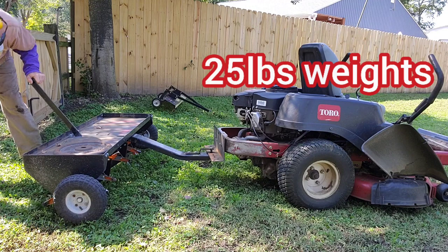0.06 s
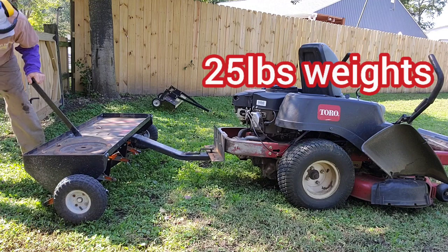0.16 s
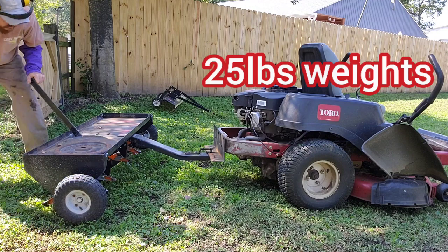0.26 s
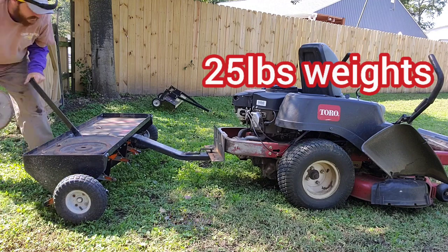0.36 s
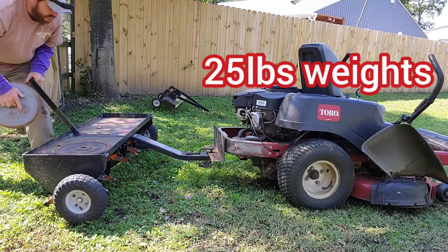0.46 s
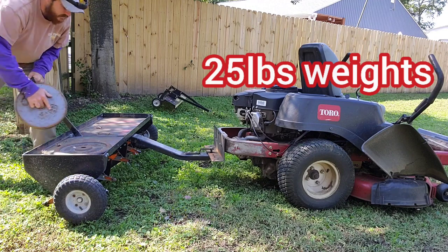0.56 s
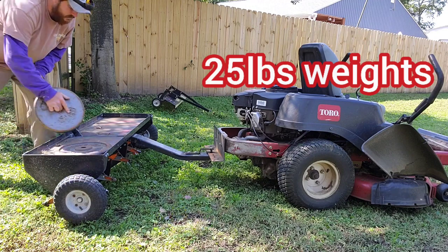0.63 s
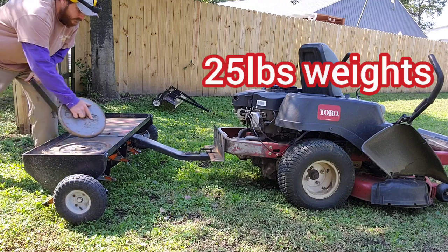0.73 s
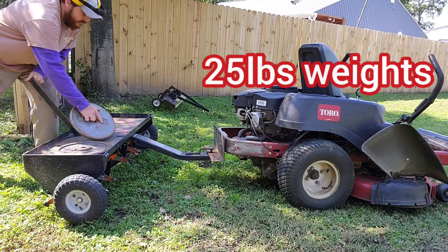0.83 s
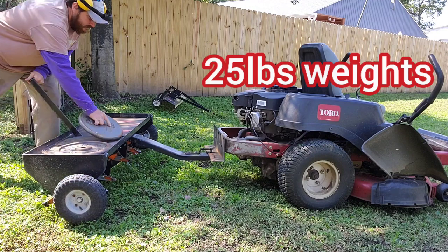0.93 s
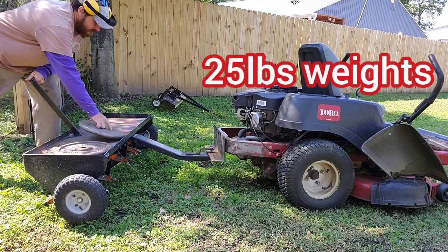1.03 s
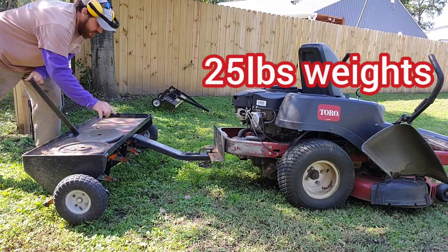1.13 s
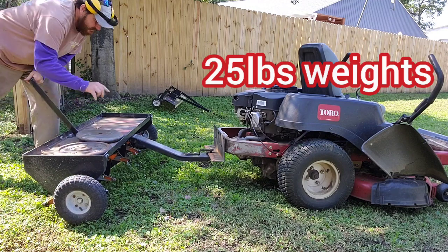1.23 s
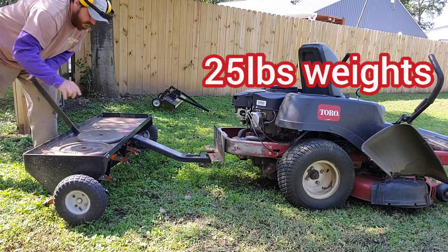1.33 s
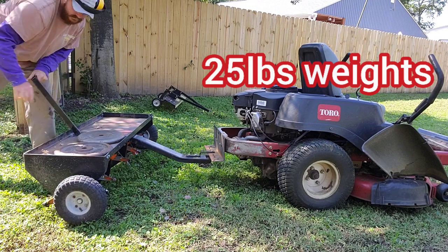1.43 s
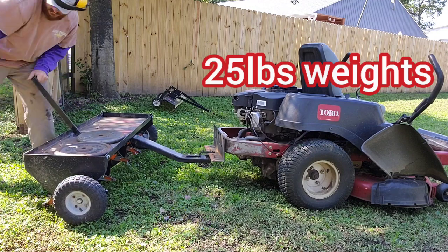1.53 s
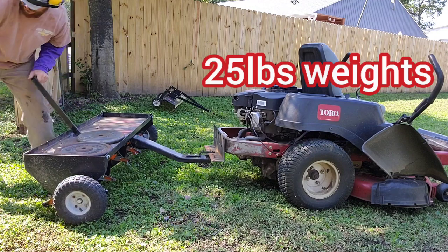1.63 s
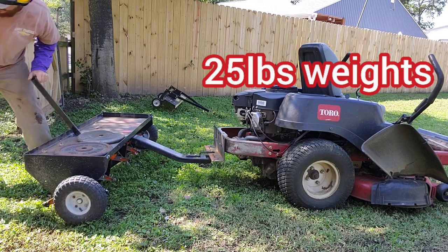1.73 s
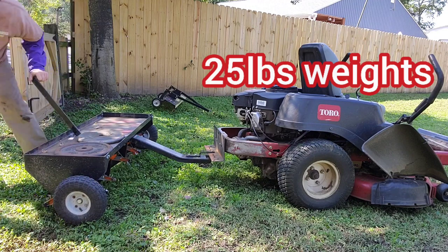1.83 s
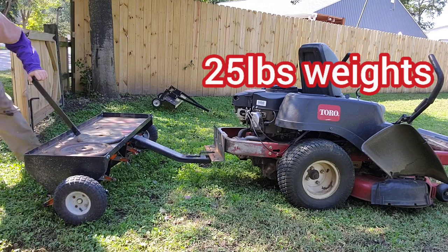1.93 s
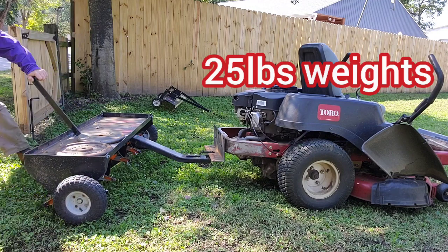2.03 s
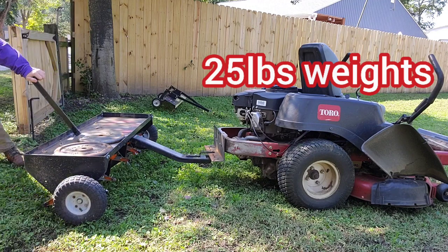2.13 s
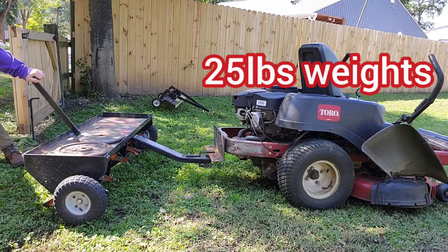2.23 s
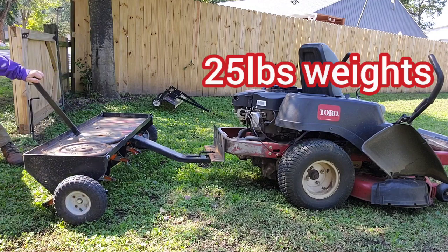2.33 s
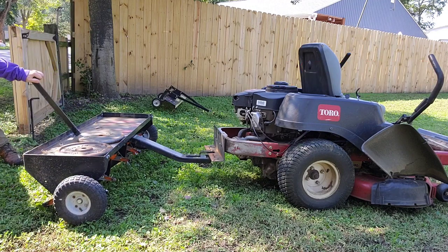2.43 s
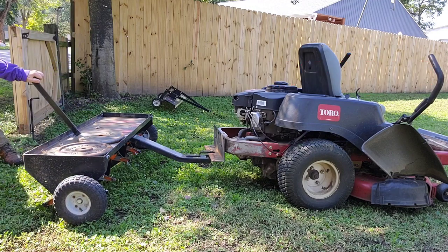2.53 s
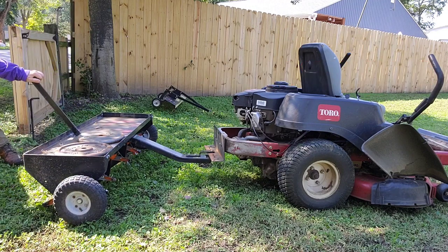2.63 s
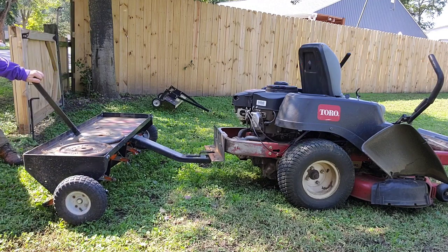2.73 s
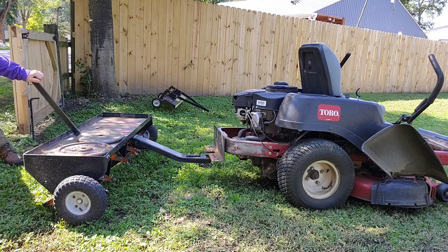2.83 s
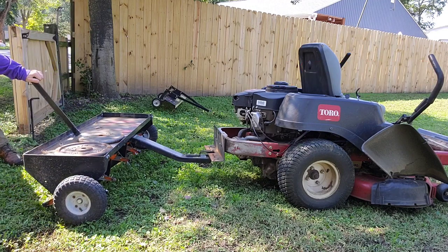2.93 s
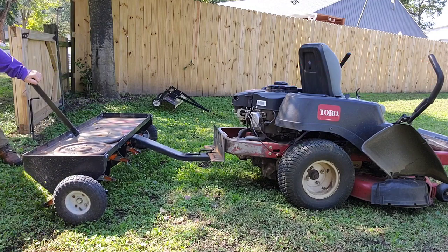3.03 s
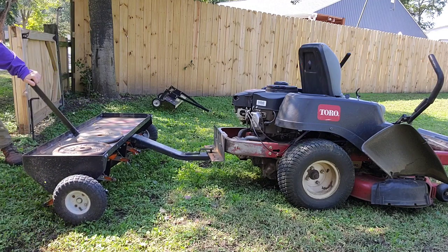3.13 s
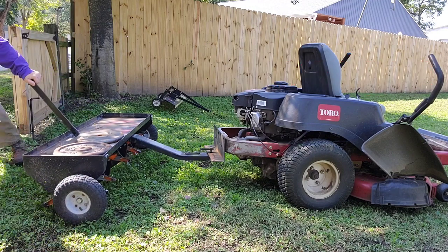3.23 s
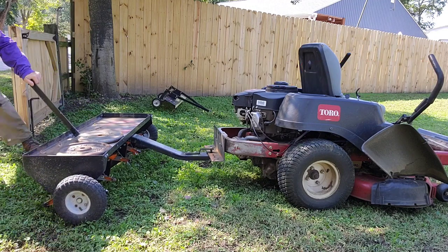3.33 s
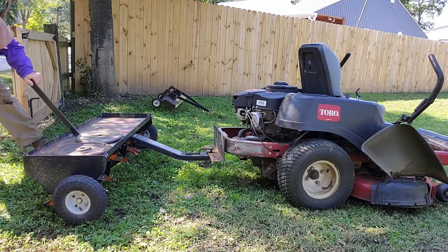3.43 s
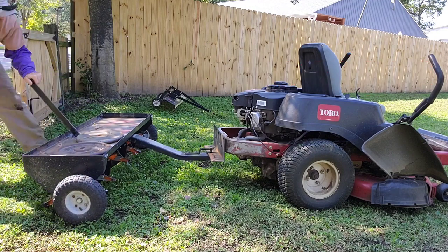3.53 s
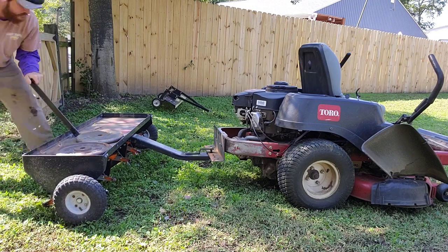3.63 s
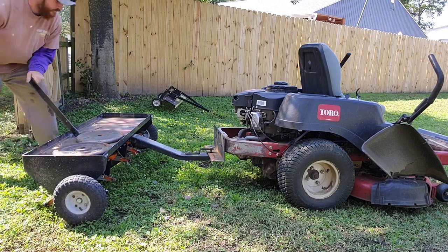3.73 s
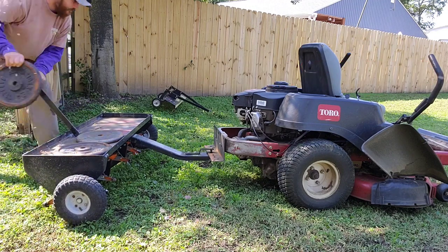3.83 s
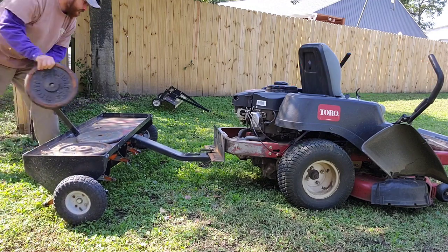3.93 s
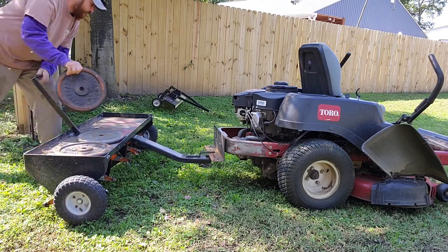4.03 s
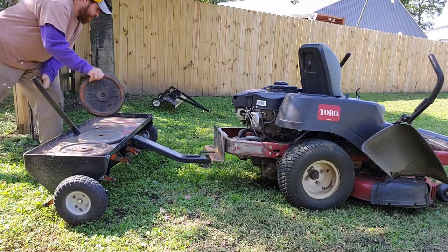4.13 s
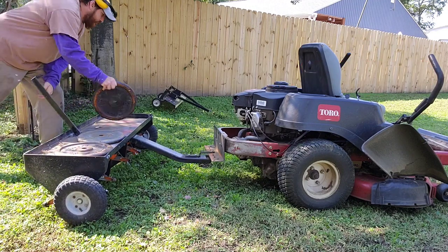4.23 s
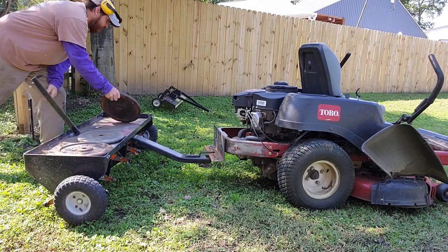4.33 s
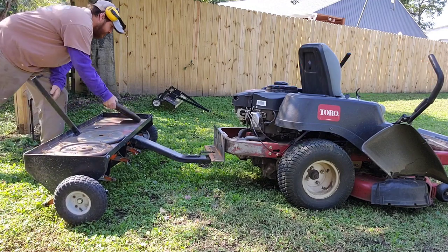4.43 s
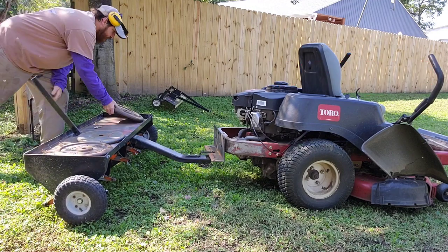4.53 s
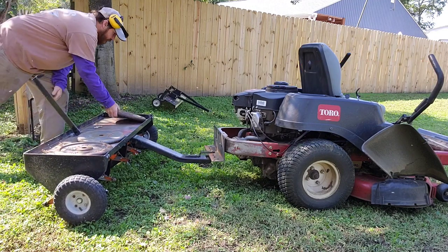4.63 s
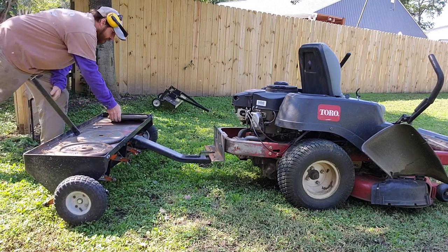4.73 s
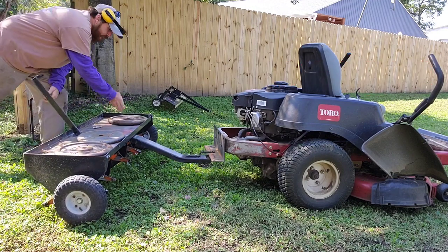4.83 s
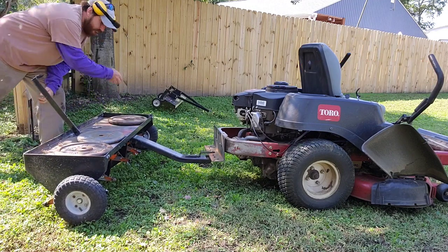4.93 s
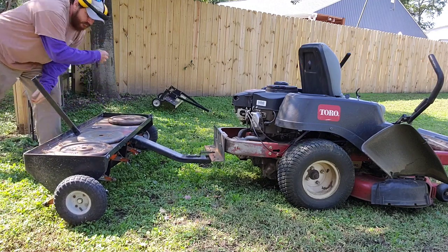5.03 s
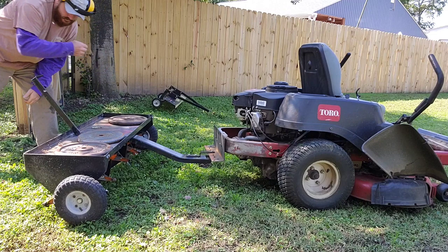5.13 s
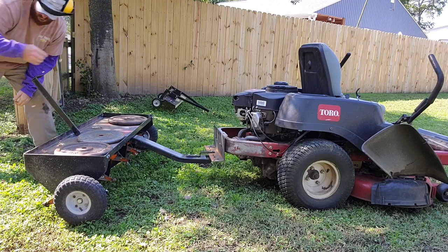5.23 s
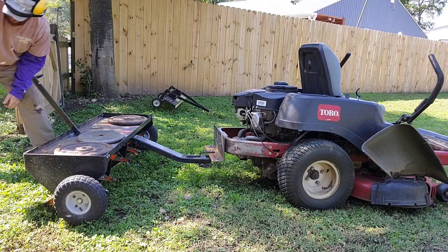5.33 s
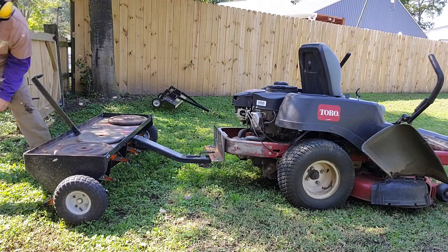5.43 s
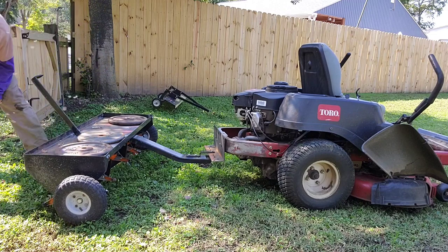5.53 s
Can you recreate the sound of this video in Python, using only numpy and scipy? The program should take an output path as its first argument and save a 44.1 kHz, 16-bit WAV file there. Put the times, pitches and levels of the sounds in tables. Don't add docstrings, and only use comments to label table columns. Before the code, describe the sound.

In an open fenced yard, an iron plate clinks off a stack, then crashes onto a steel trailer tray in a tight rattling cluster. After a pause come two brief pick-up clanks, then a second heavy run of bangs ending in the loudest hit. A faint engine drone, leaves, grassy steps and tiny bird chirps sit far below. Stereo phone a few metres away.

```python
import sys
import numpy as np
from scipy import signal
from scipy.fft import rfft, irfft, next_fast_len
from scipy.io import wavfile
from scipy.ndimage import uniform_filter1d

SR = 44100
rng = np.random.default_rng(int(sys.argv[2]) if len(sys.argv) > 2 else 0)


def wav_record(signal):
    frames = np.transpose(np.atleast_2d(signal))
    bounded = np.clip(frames, -1, 1)
    quanta = np.round(bounded * 32767).astype(np.int16)
    wavfile.write(sys.argv[1], SR, quanta)


def to_linear_factor(level_db):
    exponent = np.asarray(level_db, float) / 20
    return 10 ** exponent


N = 245637
LENGTH = 18000


def along(points, hz):
    p = np.array(points, float)
    return np.interp(np.log(hz), np.log(np.maximum(p[:, 0], 1)), p[:, 1])


def convolve(a, b):
    return signal.fftconvolve(a, b, axes=-1)


def rings(hz, t60):
    t = np.arange(LENGTH) / SR
    sines = np.sin(2 * np.pi * hz[:, None] * t)
    return (sines * np.exp(-np.log(1000) * t / t60[:, None])).astype(np.float32)


def walk(rate):
    hold = int(SR / rate)
    steps = np.repeat(rng.standard_normal(N // hold + 1), hold)
    return 1.1 * uniform_filter1d(uniform_filter1d(steps, hold), hold)[:N]


def noise(hz, octaves, alike):
    size = next_fast_len(N)
    f = np.maximum(np.fft.rfftfreq(size, 1 / SR), 1)
    bell = np.exp(-(np.log2(f / hz) / octaves) ** 2)
    mid, side = irfft(rfft(rng.standard_normal((2, size))) * bell, size)[:, :N]
    alike = np.clip(alike, 0, 1)
    both = np.sqrt(1 + alike) * mid + np.sqrt(1 - alike) * side * np.array([[1], [-1]])
    return both / both.std()


# (t/s, firing f/Hz, level/dB, octave level/dB)
ENGINE = [(0.0, 78.47, -60.5, -69), (0.45, 73.86, -61.5, -72.5), (0.9, 74.38, -54, -69),
          (1.501, 77.95, -52.5, -67.5), (2.1, 76.67, -50.5, -66), (2.7, 79.08, -55, -60.5),
          (3.1, 77.9, -48.5, -63.5), (4.0, 74.7, -49.5, -74), (4.3, 78, -49, -68.5),
          (5.251, 77.4, -52.5, -60), (5.57, 79.4, -54.5, -77.5)]
# (f/Hz, level/dB)
HUMS = [(52, -61.5), (94, -63), (180, -77), (760, -83), (950, -91.5)]


def drone():
    s, *columns = np.transpose(ENGINE)
    hz, db, octave_db = (np.interp(np.arange(N) / SR, s, c) for c in columns)
    phase = 2 * np.pi * np.cumsum(hz * (1 + 0.005 * walk(23))) / SR
    out = to_linear_factor(db + 3.0 * walk(8.8)) * np.sin(phase)
    out += to_linear_factor(octave_db + 1.8 * walk(27)) * np.sin(2 * phase)
    for hum_hz, hum_db in HUMS:
        hum_phase = 2 * np.pi * np.cumsum(hum_hz * (1 + 0.019 * walk(8.6))) / SR
        out += to_linear_factor(hum_db + 2.4 * walk(1.7)) * np.sin(hum_phase)
    return np.sqrt(2) * out


def air(spectrum, level_db, bands_hz, swell_db, flicker_db):
    out, swell = 0, walk(0.7)
    for hz in bands_hz:
        db = along(spectrum, hz) + 10 * np.log10(hz) + swell_db * swell + flicker_db * walk(6.9)
        out = out + to_linear_factor(db) * noise(hz, .27, 1.05 - hz / 900)
    return out / out.std() * to_linear_factor(level_db)


# (f/Hz, level/dB per Hz)
RUMBLE_COLOUR = [(20, -13.5), (55, -5), (81, -2), (129, -11), (169, -11.5), (226, -19), (260, -28)]


def rumble():
    s, _, engine_db, _ = np.transpose(ENGINE)
    follow = 0.59
    nearness = to_linear_factor(follow * np.interp(np.arange(N) / SR, s, engine_db - engine_db.mean()))
    return nearness * air(RUMBLE_COLOUR, -58, np.geomspace(22, 220, 11), swell_db=1.6, flicker_db=3.5)


# (f/Hz, level/dB per Hz)
LEAF_COLOUR = [(200, -12.5), (300, -6.5), (400, -13), (763, -10.5), (1080, -15), (1810, -14), (4120, -22),
               (10300, -35.5), (16000, -36)]
# (t/s, level/dB)
BREEZE_LEVEL = [
    (0, 4),
    (.6, 0.5),
    (1.8, 4.5),
    (2.6, 2),
    (3.5, 1.5),
    (3.95, -0.5),
    (5.1, 11),
    (5.57, 0.5),
]


def leaves():
    breeze = to_linear_factor(np.interp(np.arange(N) / SR, *np.transpose(BREEZE_LEVEL)))
    return breeze * air(LEAF_COLOUR, -69, np.geomspace(260, 15500, 17), swell_db=.6, flicker_db=.9)


SLIDE_SWELL = .75


def timed(knocks, swell_s, slides=()):
    return [row + (swell_s,) for row in knocks] + [row + (SLIDE_SWELL * row[4],) for row in slides]


# (f/Hz, level/dB per Hz)
SHEET_COLOUR = [(90, -18.5), (151, -17.5), (345, -4.5), (402, -9), (720, -13.5), (1540, -10), (2090, -9.5),
                (3220, -6), (3910, -10.5), (5410, -6), (8000, -19), (9310, -33.5), (11800, -26),
                (16000, -41)]
# (f/Hz, time to fall 60 dB/s)
SHEET_DECAY = [(100, 0.48), (400, 0.21), (1500, 0.22), (5000, 0.07), (12000, 0.034)]
TILT_HZ = (320, 1500, 5600, 10500)


def blows(table, modes, sheet_hz, sheet, pan_db, edge_db, modes_db, scatter_db=2.0, grit_db=3.6,
          first=2.3, apart_hz=700, crack=0.51, crack_s=0.0012, own_spread=1.1, slide_grit_db=1.5):
    own_hz, own_width, own_db = np.transpose(modes)
    own_t60 = 1.7 * np.log(1000) / (np.pi * own_width)
    own = rings(own_hz, np.clip(own_t60, .05, 1.9 * along(SHEET_DECAY, own_hz)))
    hz, count = np.concatenate([sheet_hz, own_hz]), len(sheet_hz)
    sheet_db = along(SHEET_COLOUR, sheet_hz)
    sheet_db = sheet_db + 10 * np.log10(sheet_hz ** .45 / along(SHEET_DECAY, sheet_hz))
    db = np.concatenate([sheet_db - sheet_db.max(), own_db + modes_db])
    part = np.array([hz < 600, (hz >= 600) & (hz < 3500), hz >= 3500])
    flat_db = -10 * np.log10(part @ to_linear_factor(db) ** 2 / 2)
    scatter_db = np.where(np.arange(len(hz)) < count, scatter_db, scatter_db / 2)
    alike = 1 - .5 * hz ** 2 / (hz ** 2 + apart_hz ** 2)
    lean = own_spread * rng.standard_normal(len(hz)) * np.sqrt(1 - alike)
    t = np.arange(LENGTH) / SR
    out = np.zeros((2, N + 2 * LENGTH))
    for s, body_db, boom_db, clank_db, chatter, swell in table:
        sliding = swell > .006
        place, side, left, right = rng.standard_normal((4, len(hz)))
        tilt = flat_db[[0, 1, 2, 2]] + [boom_db, 0, clank_db, clank_db + edge_db]
        tilt_db = along(np.transpose([TILT_HZ, tilt]), hz)
        ears = np.sqrt(alike) * np.sign(side) + np.sqrt(1 - alike) * np.array([left, right])
        ears[:, count:] = (np.sign(side) * (1 + np.array([lean, -lean])))[:, count:]
        gain = (to_linear_factor(body_db + db + tilt_db + scatter_db * place) * ears).astype(np.float32)

        rise = (1 - np.exp(-2 * (t + 1 / SR) / max(swell, .0001))) ** 2
        roughness_db = slide_grit_db if sliding else grit_db
        contacts = rng.standard_normal(LENGTH) * to_linear_factor(roughness_db * rng.exponential(size=LENGTH))
        contacts *= rise * np.exp(-t / max(chatter, .001))
        contacts[int(swell * SR)] = first * np.abs(contacts).max() * np.exp(-swell / 0.0018)
        contacts = contacts[None] / np.linalg.norm(contacts)

        i = int(s * SR)
        steel = gain[:, :count] @ sheet * (1 + crack * np.exp(-t / crack_s))
        plate = gain[:, count:] @ own
        out[:, i:i + 2 * LENGTH - 1] += convolve(steel + sliding * plate, contacts)
        out[:, i:i + LENGTH] += (not sliding) * rise * plate
    return out[:, :N] * to_linear_factor(np.array([[pan_db], [-pan_db]]) / 2)


FIRST_SCRAPE = [
    (0.012, -50, -6.5, 0, 0.017),
]
FIRST_PICK = [
    (0.045, -30.5, -12.5, -2, 0.013),
    (0.074, -44, 8, -13, 0.021),
]
DROP_SLIDES = [
    (0.871, -50, -9, -2, 0.017),
    (.965, -18, 1.5, -10, 0.037),
    (0.987, -18.5, -5.5, -3.5, 0.013),
    (1.075, -28, -5.5, -3, 0.019),
    (1.276, -13.5, -2, -1.5, 0.03),
]
FIRST_TOUCH = [
    (0.89, -25.5, 9, -10.5, 0.027),
    (0.906, -27, 3, -7, 0.03),
    (0.924, -25, -1.5, -7.5, 0.026),
    (1.004, -19, -8, -0.5, 0.0047),
    (1.039, -18, -9, -14, 0.13),
]
FIRST_DROP = [
    (1.105, -17.5, -1.5, 5, 0.006),
    (1.116, -18.5, -1.5, 5.5, 0.035),
    (1.132, -8.5, -12.5, -0.5, 0.012),
    (1.141, -12.5, -11.5, 2.5, 0.01),
    (1.151, -12, -6, 3.5, 0.019),
    (1.168, -10.5, -18.5, 1.5, 0.0087),
    (1.177, -13, -11, -0.5, 0.012),
    (1.197, -8.5, -19, -6.5, 0.031),
    (1.235, -11.5, -17.5, -11, 0.013),
]
FIRST_SETTLE = [
    (1.292, -22, -17, 5, 0.0047),
    (1.299, -13, -9, 3, 0.014),
    (1.309, -9, -18.5, -6.5, 0.038),
    (1.349, -9.5, -29, -24, 0.043),
    (1.397, -21.5, -8.5, -11, 0.02),
    (1.44, -23, -14.5, -37, 0.0079),
    (1.499, -28, -10.5, -5.5, 0.0079),
]
SECOND_SWELL = [
    (2.975, -46, 1.5, -24, 0.046),
    (3.012, -44, -4, -14, 0.042),
    (3.045, -36.5, -3.5, -10.5, 0.041),
]
SECOND_PICK = [
    (3.07, -20.5, -21, -2, 0.0062),
    (3.089, -31.5, 6, -0.5, 0.011),
]
SECOND_SETTLE = [
    (3.125, -24, -6, -8, 0.024),
    (3.159, -22, -22, -14, 0.0071),
    (3.189, -26.5, -37.5, -23, 0.007),
]
THIRD_SWELL = [
    (4.002, -46, -8.5, -13.5, 0.033),
    (4.047, -24, -18.5, -17.5, 0.054),
]
THIRD_PICK = [
    (4.075, -17, -9.5, -2, 0.0078),
]
THIRD_SETTLE = [
    (4.166, -30.5, -5.5, -4, 0.011),
    (4.218, -34.5, -7, -32, 0.027),
]
LAST_SLIDES = [
    (4.355, -31, -9.5, -1, 0.02),
    (4.578, -31, 0.5, -3.5, 0.015),
    (4.857, -14.5, -2, 4, 0.027),
]
LAST_TOUCH = [
    (4.37, -8.5, -5, -11, 0.015),
    (4.398, -12, -6.5, -3.5, 0.017),
    (4.444, -17, -3, -14, 0.044),
    (4.473, -26.5, -10.5, -6, 0.3),
]
LAST_TILT = [
    (4.59, -10.5, -9, -14, 0.0092),
    (4.596, -16.5, -16.5, -8.5, 0.021),
    (4.632, -9.5, -14, -4, 0.0098),
    (4.648, -14, -2.5, -8, 0.012),
    (4.678, -18.5, -6, -45.5, 0.016),
]
LAST_DROP = [
    (4.794, -19.5, -6.5, -10, 0.053),
    (4.804, -28, -8.5, -10, 0.011),
    (4.872, -12.5, -7.5, -1, 0.012),
    (4.881, -5.5, -9.5, -3.5, 0.024),
    (4.894, -14, -9.5, -5, 0.022),
    (4.91, -7.5, -8, -12.5, 0.023),
    (4.944, -14, -20, -11.5, 0.0063),
    (4.977, -26, -11, -30, 0.017),
]
# (f/Hz, width/Hz, level/dB)
FIRST_PICK_TONES = [(436, 13, 0), (592, 23, -0.5), (1090, 47, 11), (1965, 23, 1.5), (2250, 41, 10.5),
                    (2350, 35, 8.5), (3180, 37, 12.5), (3430, 33, 3), (4500, 36, -9), (4730, 47, 8.5),
                    (5500, 57, 6), (6100, 42, -14)]
FIRST_TOUCH_TONES = [(334, 180, 0.5), (920, 80, -3.5), (1370, 52, -10), (1840, 77, -6), (2320, 130, -10.5),
                     (3140, 110, -15.5), (4300, 41, -18), (4750, 23, -15), (4770, 34, -12),
                     (5190, 29, -15.5), (5450, 120, -13), (5730, 110, -10.5), (6060, 85, -13),
                     (6310, 30, -13.5)]
FIRST_DROP_TONES = [(328, 59, -4.5), (846, 42, -3.5), (1858, 48, -3.5), (2270, 110, -6.5), (2530, 54, -3.5),
                    (3150, 62, -5.5), (3450, 37, -6.5), (4040, 55, -10), (5000, 50, -4), (5300, 100, -0.5),
                    (5460, 36, -3.5), (5570, 40, -4.5), (5890, 38, -4.5), (6060, 87, -5)]
FIRST_SETTLE_TONES = [(322, 41, 0.5), (845, 37, -3.5), (1740, 130, -4.5), (1850, 23, -6.5), (2350, 120, -6),
                      (2754, 26, -11), (3490, 34, -7), (3660, 43, -9.5), (4200, 46, -8.5),
                      (4780, 100, -8.5), (5330, 150, -10), (5720, 69, -5), (5880, 23, -7),
                      (6260, 42, -10.5)]
FIRST_REST_TONES = [(226, 150, -2.5), (877, 28, -5.5), (955, 6, -1.5), (1185, 31, -0.5), (1510, 42, -4),
                    (1702, 63, -3), (2520, 47, -1), (3240, 46, 5), (3500, 23, -11)]
SECOND_SWELL_TONES = [(528, 38, 8.5), (1070, 29, -6), (1500, 29, -9), (1882, 29, -16), (2870, 32, -14.5),
                      (4180, 30, -24), (5310, 27, -23.5)]
SECOND_PICK_TONES = [(299, 160, -10), (577, 15.2, 0), (1040, 29, 2), (1580, 42, -17), (2330, 30, -1.5),
                     (3450, 110, -12), (3850, 36, -14), (4350, 30, -6), (4550, 48, -11), (5570, 22, -25),
                     (5440, 100, -5), (5950, 34, -8), (7740, 30, -4), (8280, 54, -11)]
SECOND_SETTLE_TONES = [(224, 21, 2.5), (376, 22, -7), (869, 12.8, -0.5), (1510, 25, -5), (1810, 23, -2),
                       (2290, 17, -9), (2960, 56, 12), (3290, 120, -12.5), (4090, 120, -1), (4710, 90, -13),
                       (4960, 62, -11), (5400, 38, -8), (5630, 30, -10)]
THIRD_PICK_TONES = [(447, 36, -2.5), (1040, 24, -8.5), (1519, 26, -4), (2410, 170, -12), (3010, 42, -12),
                    (3270, 61, -13.5), (3470, 42, -11.5), (4600, 26, -11), (5500, 25, -14), (5910, 30, -10),
                    (6100, 39, -15.5), (7030, 93, -22.5), (7780, 41, -12.5), (8000, 25, -17)]
THIRD_SETTLE_TONES = [(455, 32, -1.5), (870, 30, -9), (1020, 34, -9), (1500, 26, -5), (1880, 93, 1),
                      (2280, 41, -9), (2860, 100, -11), (3320, 32, -12.5), (4040, 62, -15), (4600, 77, -12),
                      (5230, 37, -13), (5730, 50, 0), (6350, 39, -2.5)]
LAST_TOUCH_TONES = [(355, 130, -1.5), (607, 35, -3), (947, 39, -5), (1285, 28, -9), (1530, 53, -3),
                    (2650, 43, -13.5), (3170, 94, -16), (3830, 27, -18.5), (4290, 28, -17.5),
                    (4860, 43, -13), (5400, 80, -14.5), (5630, 100, -13.5), (6000, 66, -14),
                    (6420, 30, -16.5)]
LAST_TILT_TONES = [(450, 51, -2), (780, 32, -7.5), (1167, 25, -12), (1410, 30, 0), (1880, 55, -6.5),
                   (2390, 50, 4), (2540, 40, 2), (3180, 40, 5), (4880, 42, -15.5), (5380, 130, -8.5),
                   (5790, 39, -12.5), (6370, 49, -18)]
LAST_LAY_TONES = [(350, 44, 1.5), (781, 65, -5), (1520, 30, -8.5), (1750, 59, -3), (1940, 41, -3.5),
                  (2650, 45, -1), (3160, 81, -10.5), (4020, 39, -15.5), (4300, 57, -16.5), (5070, 40, -8.5),
                  (5640, 70, -2), (6090, 40, -8.5)]
LAST_NUDGE_TONES = [(371, 150, 2.5), (1410, 55, 3.5), (1870, 67, -0.5), (2310, 49, -8), (3280, 32, -7.5),
                    (3490, 37, -11), (5160, 120, -11.5), (5650, 58, -6), (5940, 54, -8), (6640, 26, -18)]
LAST_DROP_TONES = [(339, 71, -0.5), (1154, 23, -4), (1520, 47, -2.5), (1770, 45, -3.5), (2270, 46, -5.5),
                   (2620, 23, -9), (3100, 370, -8.5), (3490, 24, -9.5), (4730, 56, -14.5), (5200, 38, -9.5),
                   (5520, 40, -7), (6060, 100, -8.5), (6610, 56, -15.5), (6930, 27, -11)]
# (f/Hz, width/Hz, level/dB)
TRAY_TONES = [(955, 7.1, -16.5), (863, 7.1, -19), (1720, 9, -18.5), (448.4, 7, -16)]


def plates():
    hz = 110 + 15800 * ((np.arange(900) + rng.random(900)) / 900) ** 1.8
    sheet = rings(hz, along(SHEET_DECAY, hz) * np.exp(0.21 * rng.standard_normal(len(hz))))
    iron, tray = 0.00071, 0.0029
    groups = [
        (timed(FIRST_PICK, iron, FIRST_SCRAPE), FIRST_PICK_TONES, 1.5, 6.5),
        (timed(FIRST_TOUCH, tray, DROP_SLIDES[:4]), FIRST_TOUCH_TONES, .3, 9),
        (timed(FIRST_DROP, tray), FIRST_DROP_TONES, .3, 9),
        (timed(FIRST_SETTLE[:4], tray, DROP_SLIDES[4:]), FIRST_SETTLE_TONES, .3, 9),
        (timed(FIRST_SETTLE[4:], tray), FIRST_REST_TONES, .3, 9),
        (timed([], iron, SECOND_SWELL), SECOND_SWELL_TONES, 1.5, 14),
        (timed(SECOND_PICK, iron), SECOND_PICK_TONES, 6, 12),
        (timed(SECOND_SETTLE, 2 * tray), SECOND_SETTLE_TONES, 3, 11),
        (timed(THIRD_PICK, iron, THIRD_SWELL), THIRD_PICK_TONES, 6, 13),
        (timed(THIRD_SETTLE[1:], 2 * tray, THIRD_SETTLE[:1]), THIRD_SETTLE_TONES, .3, 12),
        (timed(LAST_TOUCH, tray, LAST_SLIDES[:1]), LAST_TOUCH_TONES, .3, 9),
        (timed(LAST_TILT[:2], tray, LAST_SLIDES[1:2]), LAST_TILT_TONES, .3, 9),
        (timed(LAST_TILT[2:], tray), LAST_LAY_TONES, .3, 9),
        (timed(LAST_DROP[:2], tray), LAST_NUDGE_TONES, .3, 8),
        (timed(LAST_DROP[2:], tray, LAST_SLIDES[2:]), LAST_DROP_TONES, .3, 9),
    ]
    out = 0
    for table, tones, edge_db, ring_db in groups:
        out = out + blows(table, tones + TRAY_TONES, hz, sheet, pan_db=-0.8, edge_db=edge_db, modes_db=ring_db)
    no_bass = signal.butter(2, 150, "high", fs=SR, output="sos")
    out = signal.sosfilt(no_bass, out) * to_linear_factor(-1.0)
    return out + thuds(FIRST_TOUCH + FIRST_DROP + FIRST_SETTLE + LAST_TOUCH + LAST_TILT + LAST_DROP)


def yard(x, low_t60=0.86, high_t60=0.27, split_hz=2500, gap=0.012, level_db=-16):
    t = np.arange(SR) / SR
    spray = rng.standard_normal((2, SR)) * (1 - np.exp(-(t / gap) ** 2))
    low = signal.sosfilt(signal.butter(1, split_hz, fs=SR, output="sos"), spray)
    high = spray - low
    low = (low + low[::-1] * 0.4) / 3.7
    tail = low * np.exp(-np.log(1000) * t / low_t60) + high * np.exp(-np.log(1000) * t / high_t60)
    return to_linear_factor(level_db) * convolve(x, tail / np.linalg.norm(tail[0]))[:, :N]


# (t/s, level/dB, length/s, brightness/dB per octave)
FOOTSTEPS = [
    (0.314, -65.5, 0.028, -2),
    (2.107, -67, 0.029, -4),
    (3.714, -71.5, 0.0052, -2),
    (3.869, -74, 0.59, -8),
    (3.877, -71, 0.017, 1.5),
    (5.074, -63, 0.018, 2),
    (5.152, -62.5, 0.049, -1),
    (5.267, -59.5, 0.1, -1.5),
]
# (f/Hz, width/octaves, level/dB)
SWISH_BANDS = [(570, 1, -9), (1600, 0.92, -18.5), (3180, 0.88, -3.5), (6000, 0.57, -0.5),
               (11200, 0.26, -9.5), (13700, 0.19, -7)]
# (t/s, level/dB,
# length/s, centre f/Hz, width/octaves)
BAND_NOISES = [(0.17, -66, 0.052, 412, 1.), (1.634, -55, 0.14, 313, 1.), (3.333, -65, 0.14, 513.5, 0.95),
               (3.615, -65.5, 0.03, 780, 0.089), (3.748, -65, 0.053, 350, 0.56),
               (3.911, -68, .1, 2485, 0.028), (3.9, -71, 0.096, 2900, 0.041),
               (3.905, -61.5, 0.26, 2270, 0.85), (5.175, -65.5, 0.054, 7640, 0.089),
               (5.278, -66, 0.047, 7000, .1), (5.315, -56.5, 0.15, 294, 0.73),
               (5.436, -62.5, 0.37, 2550, 1.), (5.469, -74, .2, 5500, .5),
               (2.11, -77.5, 0.031, 13000, 0.26), (2.272, -83.5, 0.054, 13040, 0.23),
               (3.86, -76, .045, 12740, .25)]


def feet():
    out, t = 0, np.arange(N) / SR

    def bell(s, length):
        return np.exp(-((t - s) / length) ** 2)

    for hz, octaves, band_db in SWISH_BANDS:
        loss = 150 * (hz > 13000)
        level = 0
        for s, db, length, bright_db in FOOTSTEPS:
            level = level + to_linear_factor(db + bright_db * np.log2(hz / 3100) - loss * length) * bell(s, length)
        crackle = to_linear_factor(band_db + 2.2 * walk(80) + 1.1 * walk(21))
        out = out + level * crackle * noise(hz, octaves, 0.11)
    for s, db, length, hz, octaves in BAND_NOISES:
        rough = to_linear_factor(db + 1.8 * walk(100) + 1.2 * walk(28))
        out = out + rough * bell(s, length) * noise(hz, octaves, 0.41)
    return out


def thuds(table):
    push = np.zeros(N)
    for s, body_db, boom_db, *_ in table:
        push[int(s * SR)] = to_linear_factor(body_db + boom_db - 22)
    soft = uniform_filter1d(push, 130)
    bob_hz, bob_t60_s = np.array([91]), np.array([0.49])
    return convolve(soft, rings(bob_hz, bob_t60_s)[0])[:N]


# (t/s, length/s, from f/Hz, to f/Hz, level/dB)
CHIRPS = [
    (2.458, 0.052, 6120, 7300, -62),
    (3.347, 0.05, 5610, 7500, -59),
    (3.698, 0.017, 5300, 6000, -59.5),
]


def bird():
    out = np.zeros(N)
    for s, length, from_hz, to_hz, db in CHIRPS:
        u = np.linspace(0, 1, int(length * SR))
        i = int(s * SR)
        phase = 2 * np.pi * np.cumsum(from_hz + (to_hz - from_hz) * u) / SR
        out[i:i + len(u)] = to_linear_factor(db) * np.sin(np.pi * u ** 1.93) * np.sin(phase)
    return out * to_linear_factor([[1.5], [-1.5]])


def scene():
    iron, song = plates(), bird()
    echoes = yard(iron + to_linear_factor(13.0) * song)
    return iron + echoes + song + drone() + rumble() + leaves() + feet()


def roll_off(x):
    return signal.sosfilt(signal.butter(12, 16460, fs=SR, output="sos"), x)


def record(dry):
    lag = 6
    ports = np.array([to_linear_factor(-0.7) * np.roll(dry[0], lag), to_linear_factor(-0.03) * dry[1]])
    ports = ports + to_linear_factor(-65) * noise(26, .6, 0.084)
    rounded = np.tanh(.6 * ports) / .6
    cut = signal.sosfilt(signal.ellip(12, .5, 85, 15800, fs=SR, output="sos"), rounded)
    clipped = np.clip(cut, -.9, .9)
    return roll_off(clipped)


dry = scene()
out = record(dry)
wav_record(out)
```